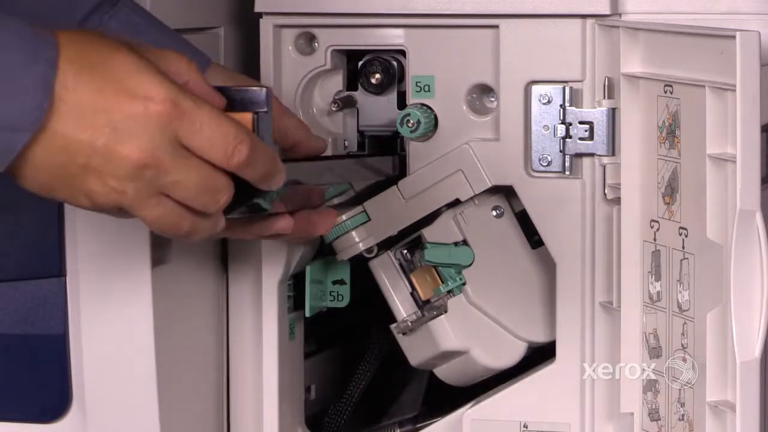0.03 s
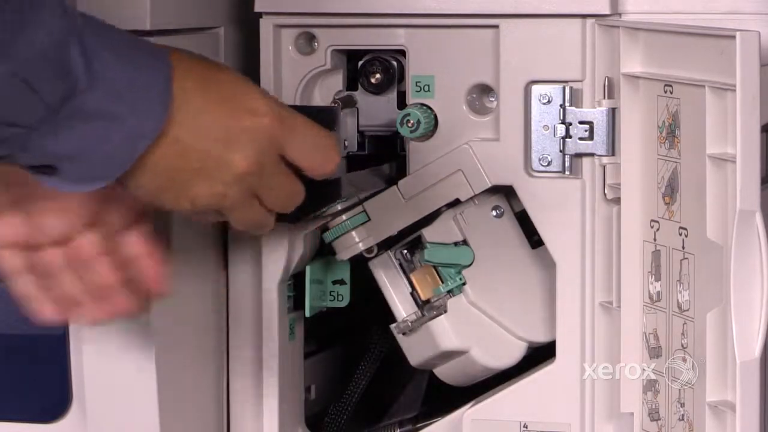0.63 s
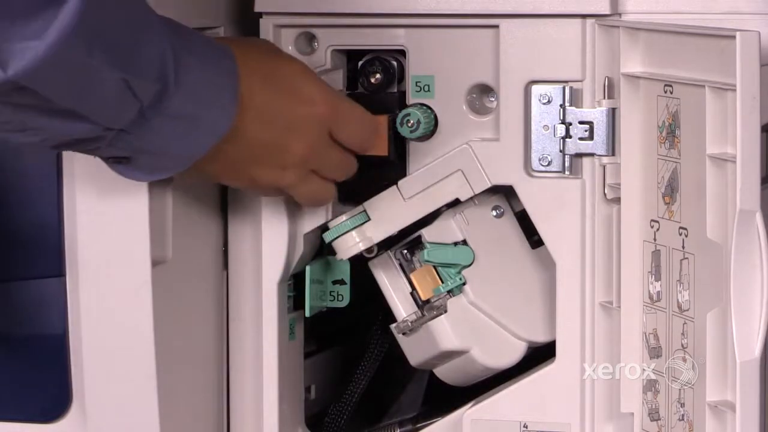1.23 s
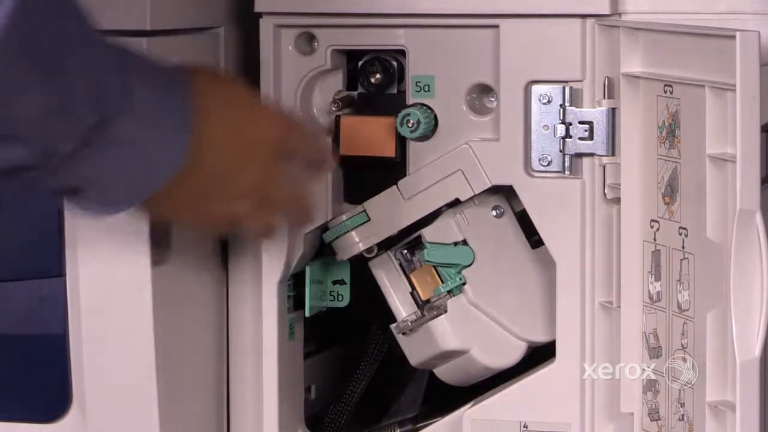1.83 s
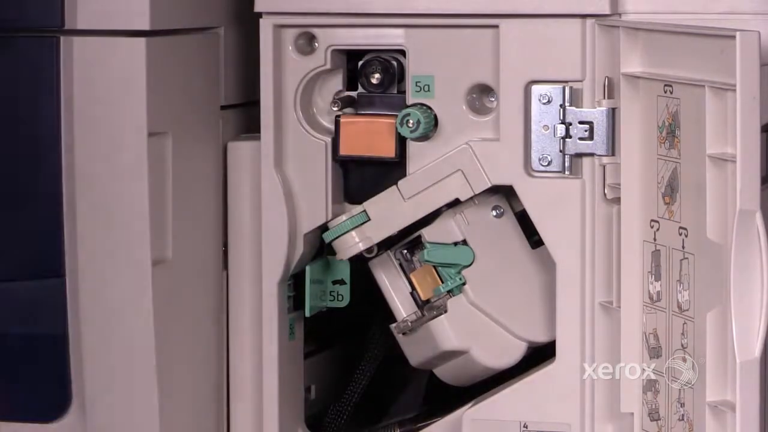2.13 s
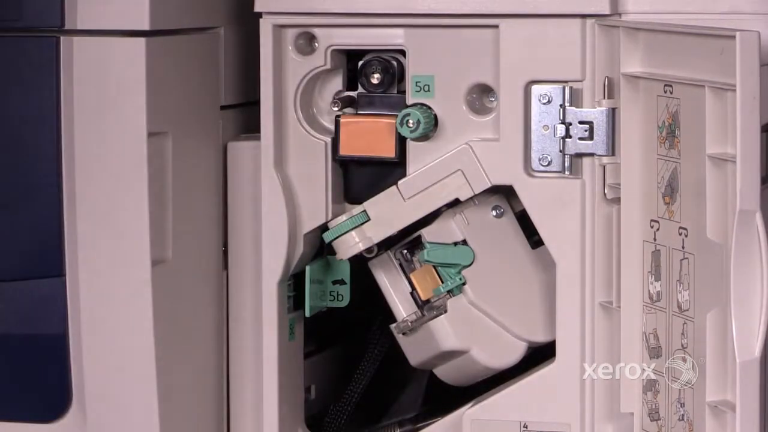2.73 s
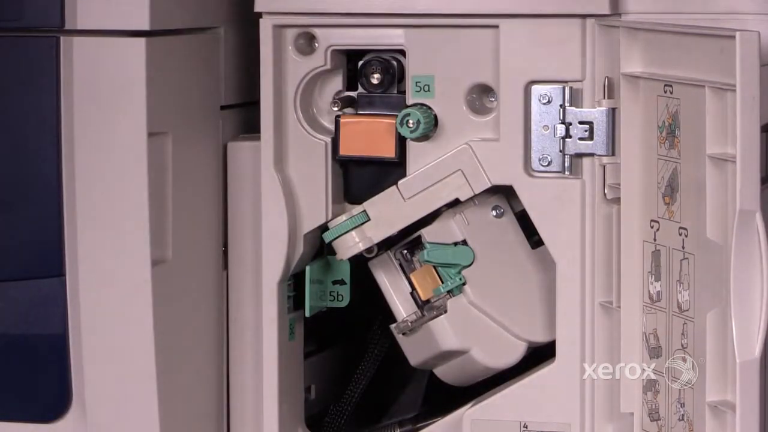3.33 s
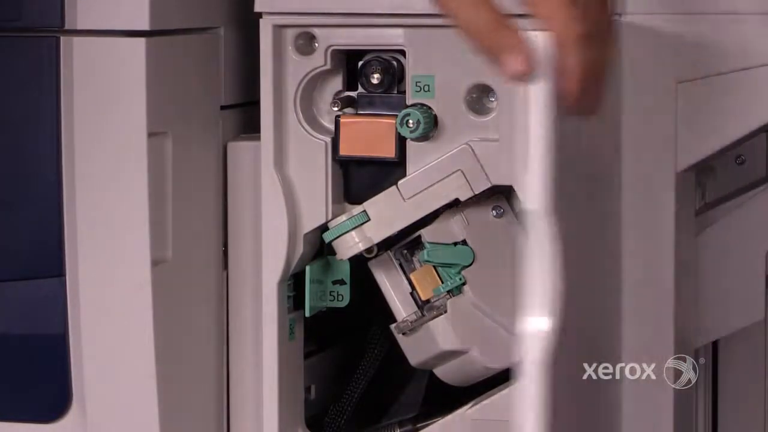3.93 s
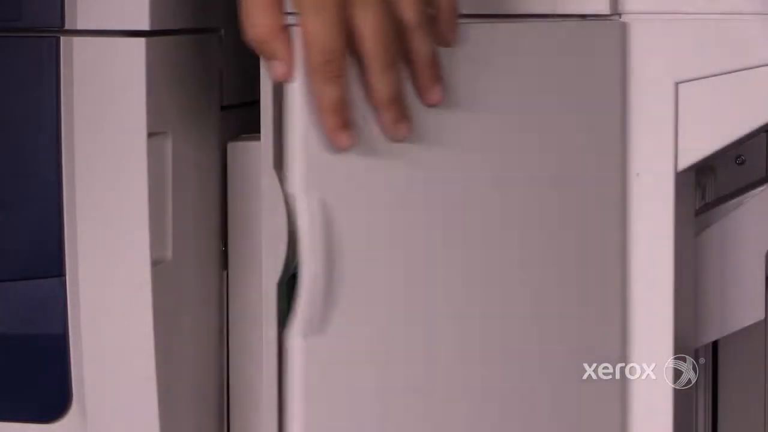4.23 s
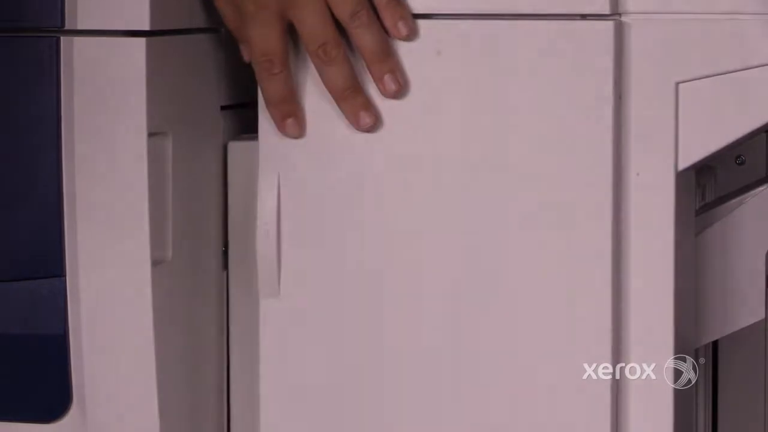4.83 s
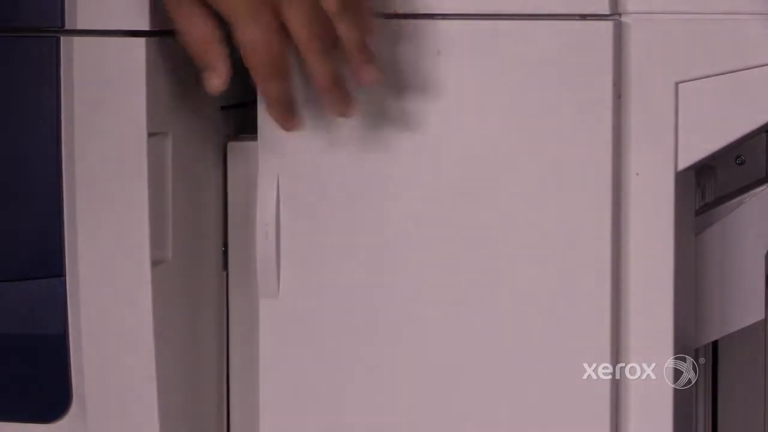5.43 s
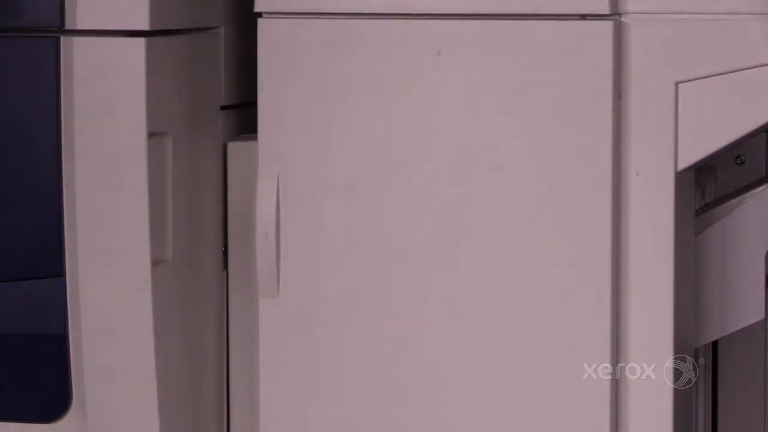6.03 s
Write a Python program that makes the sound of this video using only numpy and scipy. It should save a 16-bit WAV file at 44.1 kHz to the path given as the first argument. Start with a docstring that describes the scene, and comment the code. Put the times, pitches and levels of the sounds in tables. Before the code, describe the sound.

A quiet, slightly wavering fan drone runs throughout, heard close to an office machine in a small room. From the start to about 1.8 seconds, a hollow plastic waste container is pushed into its slot with faint scrapes and light knocks. It bumps around 0.5 seconds, seats with a firmer cluster of clacks at about 1.3, and gives one more small knock at 1.7. A hand makes soft, dull taps on the covers near 2.2, 3.1 and 4.2 seconds. At about 4.9 seconds the door shuts with one sharp knock and the bright snap of a sprung catch, much louder than anything else. The cabinet rings and fades within a second, with a short room echo. Two very faint touches follow near 5.4 and 5.7 seconds. Everything is on the left channel; the right carries only faint hiss.

```python
"""A plastic waste container bumps, slides and seats in an office machine, its hollow body ringing.
A hand taps the covers; then the door snaps shut on its sprung catch and the cabinet rings on.
Behind it all a fan drones and wavers, and the small office answers the door.
One microphone, close to the machine, feeds the left channel; the right holds only the recorder's hiss."""
import sys
import numpy as np
from scipy import signal
from scipy.fft import rfft, irfft
from scipy.io import wavfile

SR = 44100
rng = np.random.default_rng(int(sys.argv[2]) if len(sys.argv) > 2 else 0)


def file_out(sig):
    """Save sig as 16-bit WAV at sys.argv[1]."""
    # one column per channel
    cols = np.atleast_2d(sig).T
    # limit, then scale
    lim = np.clip(cols, -1, 1)
    pcm = np.round(lim * 32767).astype(np.int16)
    wavfile.write(sys.argv[1], SR, pcm)


N = 268216
TIME = np.arange(N) / SR


def amp(db):
    """Decibels to gain."""
    return 10 ** (np.asarray(db) / 20)


def unit(x):
    """Scales to rms 1."""
    return x / np.sqrt(np.mean(x ** 2) + 1e-20)


def read(points, hz):
    """Reads a curve on a log-frequency axis."""
    freq_hz, value = np.transpose(points)
    return np.interp(np.log(hz + 1), np.log(freq_hz + 1), value)


def colour(x, spectrum):
    """Gives x a spectrum, at rms 1."""
    gain = amp(read(spectrum, np.fft.rfftfreq(len(x), 1 / SR)))
    return unit(irfft(rfft(x) * gain, len(x)))


def wander(hz):
    """Slow random motion of rms 1, up to about this rate."""
    rolloff = 1 + (np.fft.rfftfreq(N, 1 / SR) / hz) ** 4
    return unit(irfft(rfft(rng.standard_normal(N)) / rolloff, N))


def add(mix, start_s, sound):
    """Mixes a sound in at a time."""
    part = mix[max(round(start_s * SR), 0):][:len(sound)]
    part += sound[:len(part)]


def ring(modes, contact_s=0.00049):
    """One second of struck modes; neighbouring modes start in opposite directions."""
    t = TIME[:SR]
    swing = sum((-1) ** k * amp(db - 60 * t / t60_s) * np.sin(2 * np.pi * hz * t)
                for k, (hz, db, t60_s) in enumerate(modes))
    return swing * (1 - np.exp(-t / contact_s))


def burst(spectrum, t60_s, rise_s):
    """One second of coloured noise that rises and dies away."""
    t = TIME[:SR]
    return colour(rng.standard_normal(SR), spectrum) * amp(-60 * t / t60_s) * (1 - np.exp(-t / rise_s))


def room(x, wet_db, build_s=0.014):
    """A sound and the office's answer: fresh diffuse echoes build up, each band dying at its own speed."""
    echo_colour = [(60, -2), (200, 9.5), (600, 1.5), (1200, 0.5), (2200, 0), (4000, -1), (8000, -4.5),
                   (15000, 4)]  # tone of the room: freq_hz, level_db
    echo_decay = [(100, 0.43), (500, 0.47), (2000, 0.68), (5000, 0.7), (10000, 0.6), (15000, 0.21)]  # its reverberation time: freq_hz, t60_s
    hz, t, bands = signal.stft(rng.standard_normal(SR), SR, nperseg=256)
    bands = bands * amp(read(echo_colour, hz)[:, None] - 60 * t / read(echo_decay, hz)[:, None])
    echoes = signal.istft(bands, SR, nperseg=256)[1][:SR]
    echoes *= 1 - np.exp(-(TIME[:SR] / build_s) ** 2)
    echoes /= np.linalg.norm(echoes)
    return x + amp(wet_db) * signal.fftconvolve(x, echoes)[:len(x)]


def fan(drone_db=-63, flutter_db=1.0, ripple_db=1.5, drift_rad=0.4):
    """Air noise and motor tones, wavering and swelling together in level."""
    air_spectrum = [(25, -4.5), (60, -2), (120, 2.5), (250, -0.5), (400, -4.5), (640, -2.5), (820, 2.5),
                    (960, -3), (1200, -1), (1500, -9.5), (2000, -7.5), (2800, -21.5), (5000, -32),
                    (15000, -28.5)]  # moving air: freq_hz, density_db
    motor_tones = [(76, -33.5), (113, -12.5), (215, -13.5), (323, -14), (430, -11), (742, -30),
                   (808, -11.5), (833, -13.5)]  # hum, relative to the air: pitch_hz, level_db
    swells = [(2.517, 7, 0.016), (2.795, 6.5, 0.13), (2.913, 10, 0.024), (3.195, 7.5, 0.02),
              (3.308, 7, .016), (3.423, 11, 0.027), (3.878, 4.5, 0.038), (4.397, 10.5, 0.033),
              (4.826, 14, 0.033), (5.219, 11, 0.024), (5.326, 12.5, 0.019), (5.437, 10.5, 0.0072),
              (5.697, 6.5, 0.028), (5.854, 4, 0.08)]  # brief rises of the drone: peak_s, rise_db, half_length_s
    air = colour(rng.standard_normal(N), air_spectrum)
    hum = sum(amp(db) * np.sqrt(2) * np.sin(2 * np.pi * hz * TIME + drift_rad * wander(hz=3.0))
              for hz, db in motor_tones)
    level_db = drone_db + flutter_db * wander(hz=30) + ripple_db * wander(hz=14)
    level_db += sum(rise_db * np.exp(-((TIME - peak_s) / half_s) ** 2)
                    for peak_s, rise_db, half_s in swells)
    return (air + hum) * amp(level_db)


def taps():
    """A hand touches the machine's covers, and once the door swings in a low push; each gives a light, dull
    ring."""
    touches = [(2.226, -52.5), (2.261, -55.5), (3.0796, -48.5), (4.246, -47), (5.427, -56), (5.694, -55.5)]  # hand on cover, and at 4.246 s the door swinging in a low push: start_s, level_db
    cover_modes = [(86, -14, 0.23), (162, -2, 0.09), (290, 1, 0.021), (477, 2, 0.011), (785, -14, 0.033),
                   (1300, -5.5, 0.016), (1940, -7.5, 0.016)]  # a cover's resonances: pitch_hz, level_db, t60_s
    out, cover = np.zeros(N), ring(cover_modes)
    for start_s, level_db in touches:
        add(out, start_s, amp(level_db) * cover)
    return out


def stroke(start_s, length_s, attack_s=0.023, release_s=0.017):
    """Gain of one push: it takes hold, stays and lets go."""
    t = np.maximum(TIME - start_s, 0)
    return (1 - np.exp(-t / attack_s)) * np.exp(-np.maximum(t - length_s, 0) / release_s)


def slide(slips_per_s=2500, spread_db=2.5, scrape_boost_db=10.5, shift_db=4, waver_db=2.0):
    """The container scrapes along its rails in tiny slips; the fan's dull drone swells with each push."""
    pushes = [(0.15, .09, -73.5, -76), (0.329, 0.093, -73, -58), (0.475, 0.036, -62.5, -67),
              (0.705, 0.15, -66.5, -61.5), (0.859, 0.13, -69.5, -59.5), (0.998, 0.035, -63.5, -57),
              (1.29, 0.047, -59.5, -58), (1.581, 0.13, -75.5, -53.5)]  # strokes in the slot: start_s, length_s, scrape_db (unboosted), drone_swell_db
    glide = (0, 1.41, -78, -67.5)  # one long, light contact under the strokes: same columns
    hollow_modes = [(1990, 180, 0), (2670, 150, 0.5), (3500, 130, -2), (4860, 260, 4), (5500, 260, 0.5),
                    (7100, 280, -4), (9400, 800, -2.5)]  # the container's resonances: pitch_hz, width_hz, level_db
    scrape_spectrum = [(20, -21), (50, 1), (110, 11), (300, -2.5), (900, 6.5), (1600, -10.5), (3200, -7.5),
                       (4400, -17), (5600, -15), (8000, -16), (9400, -15.5), (11500, -15.5), (15500, -17.5)]  # plastic slipping on plastic: freq_hz, density_db
    drone_swell_spectrum = [(20, -20), (50, -6), (200, -3.5), (320, -4), (560, -10.5), (830, 1),
                            (1400, -14), (2100, -14), (3200, -27), (5000, -43), (15000, -42)]  # the fan's dull drone: freq_hz, density_db
    slips = (rng.random(N) < slips_per_s / SR) * rng.choice([-1, 1], N)
    slips = slips * amp(spread_db * np.minimum(rng.exponential(1, N), 4))
    hollow = np.zeros(N)
    for hz, width_hz, db in hollow_modes:
        resonance = signal.lfilter(*signal.iirpeak(hz, hz / width_hz, SR), slips)
        hollow += amp(db + shift_db * wander(hz=6.7)) * resonance  # they take turns as the contact moves
    scrape = amp(scrape_boost_db) * colour(slips + hollow, scrape_spectrum)
    drone = colour(rng.standard_normal(N), drone_swell_spectrum)
    out = sum(stroke(start_s, length_s) * (amp(scrape_db) * scrape + amp(drone_swell_db) * drone)
              for start_s, length_s, scrape_db, drone_swell_db in pushes + [glide])
    return out * amp(waver_db * wander(hz=25))


def bumps():
    """Each knock against the slot cracks and rings the container's body and its hollow wall."""
    knocks = [(0.008, -63, -55, -59), (0.335, -51.5, -54.5, -70), (0.36, -62, -52.5, -70),
              (0.384, -51, -53, -73), (0.4892, -61, -63, -38.5), (0.4947, -46.5, -54, -39),
              (0.4994, -55, -46, -37.5), (0.5118, -52, -62, -52), (0.521, -56, -50, -67),
              (0.778, -48.5, -51, -56), (0.941, -69, -42.5, -52), (0.949, -46.5, -62, -68),
              (1.133, -64, -57, -55), (1.312, -59, -41.5, -42.5), (1.328, -32.5, -44, -43),
              (1.3367, -53, -28.5, -45), (1.3464, -31, -35.5, -38), (1.353, -50, -38, -45),
              (1.368, -35, -57, -48), (1.709, -47.5, -50, -49.5)]  # container on slot: start_s, thud_db, crack_db, wall_db
    body_modes = [(110, -21, 0.11), (198, -15, .2), (288.5, -11, 0.17), (397, -4.5, 0.089),
                  (573, -20, 0.041), (689.7, -2, 0.1), (874, -12, 0.1), (1100, -13, 0.076),
                  (1350, -13.5, 0.048), (1700, -25, 0.066), (2730, -11.5, 0.051), (3570, -18.5, 0.068),
                  (4720, -22, 0.045)]  # the container's body: pitch_hz, level_db, t60_s
    wall_modes = [(567, -11, 0.081), (734, -6.5, 0.12), (1030, 1, 0.09), (1524, -18, 0.071)]  # its hollow wall: pitch_hz, level_db, t60_s
    crack_spectrum = [(60, -11), (400, 7.5), (1000, 8), (2000, 1.5), (3200, -2.5), (5000, -13),
                      (10000, -17), (15500, -45)]  # the plastic's dense upper modes: freq_hz, density_db
    out, body, wall = np.zeros(N), ring(body_modes), ring(wall_modes)
    for start_s, thud_db, crack_db, wall_db in knocks:
        crack = amp(crack_db) * burst(crack_spectrum, t60_s=0.09, rise_s=0.0022)
        add(out, start_s, amp(thud_db) * body + amp(wall_db) * wall + crack)
    return out


def impact(length_s):
    """The first sharp pressure pulse of a hard contact."""
    progress = TIME[:SR] / length_s
    return (1 - progress) * np.exp(-progress)


def door(cabinet_db=-43.0, impact_db=-2, drone_tail_db=-42):
    """The door meets the frame, the sprung catch snaps, the panel lands and rattles."""
    blows = [(4.8553, -25, -38, -45), (4.8581, -29, -53, -57), (4.8640, -29.5, -33, -57),
             (4.869, -36, -35, -22.5), (4.8713, -32.5, -23, -20.5), (4.8776, -15.5, -15, -19),
             (4.8804, -41, -19, -36), (4.8844, -40, -30.5, -30.5), (4.8915, -33, -23.5, -32.5),
             (4.8969, -39, -28.5, -37)]  # door on frame: start_s, thud_db, crack_db, catch_db
    panel_modes = [(80, -14.5, 0.13), (206.5, -20.5, 0.17), (286.5, -13, 0.19), (356, -29, 0.18),
                   (415, -9.5, 0.059), (456, -14, 0.042), (518, -7, 0.091), (645, -6.5, 0.042),
                   (717, -8, 0.074), (827, -8, 0.062), (915, -7.5, 0.054), (1048, -11, 0.065),
                   (1473, -8, 0.047), (1950, -9, 0.026), (2110, -16.5, 0.074), (2320, -26, 0.023)]  # the door panel: pitch_hz, level_db, t60_s
    spring_modes = [(4753, -34, .05), (7270, -17, 0.034), (8130, -7, 0.02), (10700, -26, .05)]  # the catch's spring: pitch_hz, level_db, t60_s
    cabinet_modes = [(118, -7, 0.41), (212, -8, 0.81), (320, -3.5, 0.88), (456, 3, 0.74), (503, -21, 0.46),
                     (518, -11, 0.46), (652, 0, 0.91), (717, -12, .5), (923, -4, 0.32)]  # the cabinet's long ring: pitch_hz, level_db, t60_s
    crack_spectrum = [(20, -40), (50, -22), (150, 2), (320, 4), (500, 11.5), (1000, 3.5), (2000, -5.5),
                      (3300, -8.5), (4600, -5.5), (5300, -9.5), (7500, -9), (11000, -29), (15500, -29)]  # the panel's crack: freq_hz, density_db
    snap_spectrum = [(20, -45), (500, -6), (2000, 8), (4000, -8), (5500, -6), (7300, 2.5), (9000, -0.5),
                     (12500, 3), (15500, 0)]  # the catch's bright snap: freq_hz, density_db
    drone_tail_spectrum = [(25, -35), (60, -7), (220, -4.5), (450, -7.5), (830, -3.5), (1250, -9),
                           (2200, -16.5), (3500, -34), (15000, -35)]  # dull drone after the slam: freq_hz, density_db
    out, spring = np.zeros(N), ring(spring_modes, contact_s=0.0001)
    panel = ring(panel_modes, contact_s=0.00066) - amp(impact_db) * impact(length_s=0.00027)
    for start_s, thud_db, crack_db, catch_db in blows:
        crack = amp(crack_db) * burst(crack_spectrum, t60_s=0.042, rise_s=0.00023)
        catch = amp(catch_db) * (burst(snap_spectrum, t60_s=0.032, rise_s=0.0001) + spring)
        add(out, start_s, room(amp(thud_db) * panel + crack + catch, wet_db=-13.0))
    # the hardest blow rings the cabinet; a dull wash of drone rises after it and fades
    hardest_s = max(blows, key=lambda blow: blow[1])[0]
    drone_tail = amp(drone_tail_db) * burst(drone_tail_spectrum, t60_s=1.42, rise_s=0.055)
    add(out, hardest_s, amp(cabinet_db) * ring(cabinet_modes) + drone_tail)
    return out


def scene():
    """Container, hand, door and fan reach the one microphone, on the left channel."""
    handling = room(bumps() + slide() + taps(), wet_db=-22.5)
    return np.array([handling + door() + fan(), np.zeros(N)])


def record(dry, hiss_db=-75.5, edge_hz=15750):
    """The recorder adds its own hiss to each channel and cuts off the highest treble."""
    hiss_spectrum = [(20, -0.5), (200, 0), (1000, 0.86), (6000, 2), (15500, 1)]  # freq_hz, density_db
    hiss = amp(hiss_db) * np.array([colour(rng.standard_normal(N), hiss_spectrum) for channel in dry])
    lowpass = signal.firwin(511, edge_hz, window=("kaiser", 9), fs=SR)
    return signal.oaconvolve(dry + hiss, lowpass[None], "same")


dry = scene()
out = record(dry)
file_out(out)
```